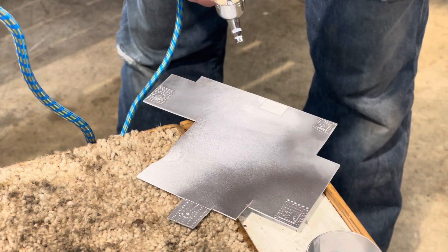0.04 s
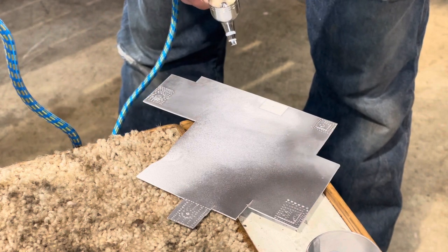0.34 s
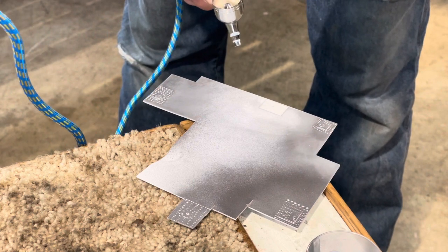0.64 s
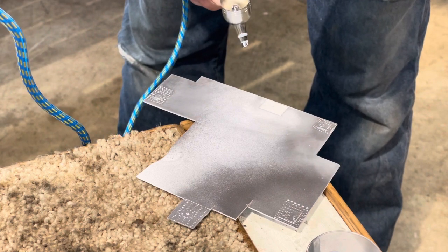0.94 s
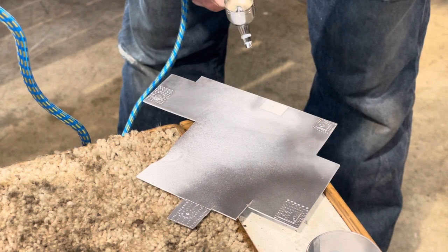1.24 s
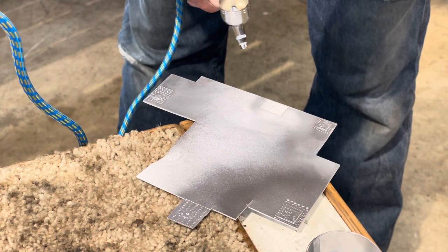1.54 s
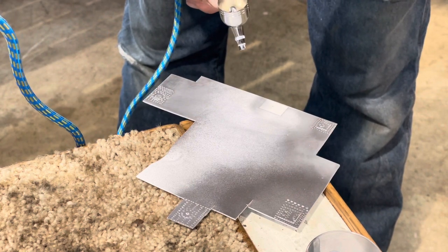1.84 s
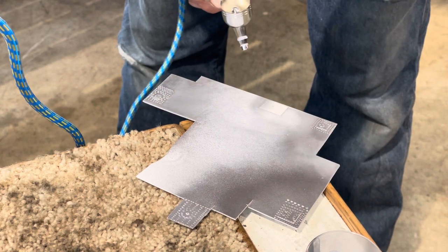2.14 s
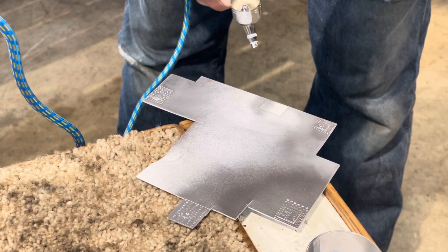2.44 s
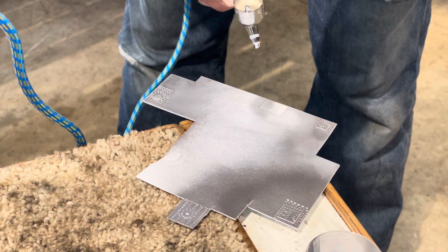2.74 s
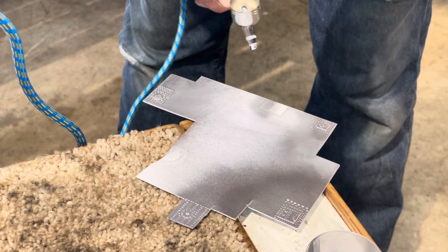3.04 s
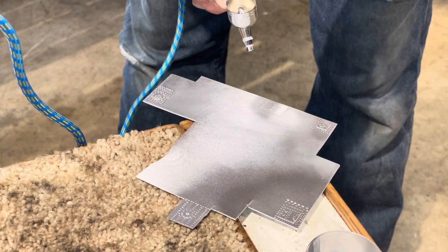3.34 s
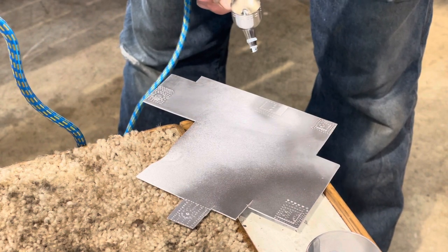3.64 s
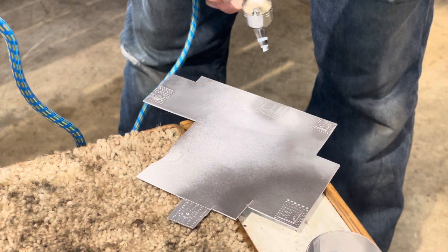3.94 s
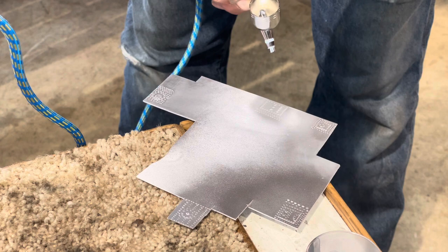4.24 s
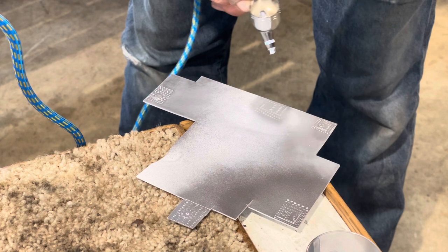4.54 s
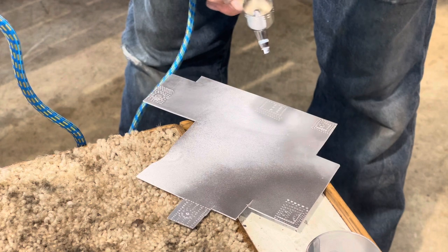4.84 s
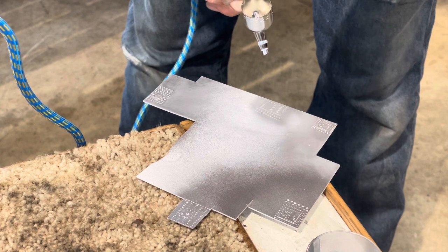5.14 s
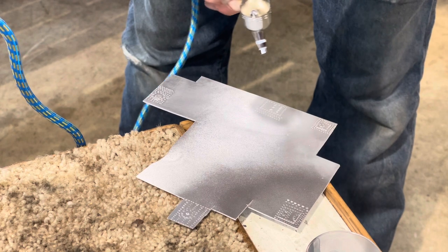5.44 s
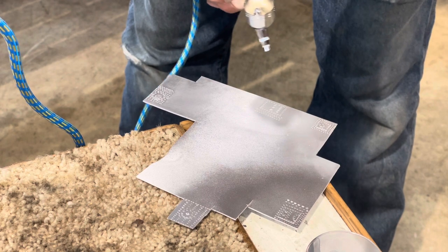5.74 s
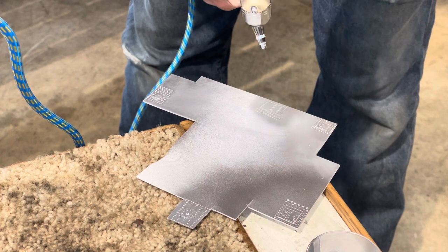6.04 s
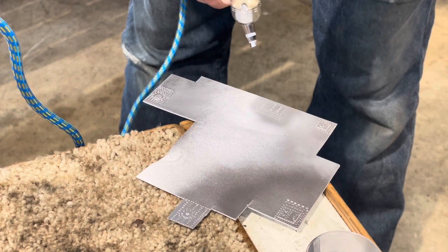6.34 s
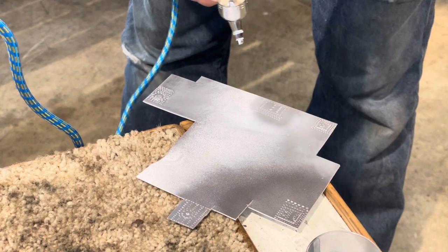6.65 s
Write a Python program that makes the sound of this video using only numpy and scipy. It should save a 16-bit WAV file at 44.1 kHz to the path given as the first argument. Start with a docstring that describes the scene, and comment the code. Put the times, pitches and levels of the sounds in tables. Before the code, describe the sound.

An airbrush sprays close to a stereo microphone at a workshop bench, giving a fine, steady, high hiss. As it sweeps to and fro over a thin metal plate, the air jet catches the edge and flares into a short, lower rush, nearly three times a second. The pulses weaken a little near the end. Nearby surfaces add short echoes, and a faint room rumble and low drone lie behind.

```python
"""At a workshop bench, an airbrush sweeps to and fro over a thin metal plate near a stereo microphone.
The nozzle hisses steadily. On every stroke the air jet crosses the plate's edge and flares into
a lower rush. The bench, floor and clutter send back short echoes.
Behind it all lie the room's rumble and a low drone, like distant traffic."""
import sys
import numpy as np
from scipy import signal
from scipy.fft import rfft, irfft, next_fast_len
from scipy.io import wavfile
from scipy.ndimage import uniform_filter1d, map_coordinates

SR = 44100
rng = np.random.default_rng(int(sys.argv[2]) if len(sys.argv) > 2 else 0)


def transcribe(signal):
    """Save signal, clipped to [-1, 1], as a 16-bit WAV file at the path in sys.argv[1]."""
    frames = np.atleast_2d(signal).T
    limited = np.clip(frames, -1, 1)
    pcm = np.round(limited * 32767).astype(np.int16)
    wavfile.write(sys.argv[1], SR, pcm)


N = 303408

# The jet crosses the plate's edge. Each row: middle in seconds, base level in dB, half length in seconds.
CROSSINGS = [(0.134, -27.5, 0.048), (0.506, -26.3, 0.047), (0.905, -27.0, .056), (1.267, -27, .05),
             (1.646, -32.5, .047), (2.03, -29, .051), (2.408, -30.1, 0.046), (2.786, -30.5, .044),
             (3.156, -27.5, .043), (3.527, -30, 0.043), (3.893, -28.5, 0.043), (4.256, -28.0, .043),
             (4.628, -27.5, .048), (5.006, -28.5, .046), (5.347, -30.5, .043), (5.714, -33.5, .037),
             (6.074, -35, .031), (6.436, -33.5, .033), (6.814, -31, 0.046)]
# How the nozzle is held. Each row: time in seconds, a score for how squarely it faces the microphone,
# boost of its high resonance in dB.
NOZZLE_AIM = [(0, 2, -2), (1.3, 2.5, -2), (2, 1, 1), (3, 0.8, 2.5), (4, -.5, 2), (5, -2, 2.5), (5.9, -2, 2),
              (6.88, -1.8, -1)]


def nozzle_hiss(hiss_db, dip_db):
    """Air leaving the nozzle makes a fine, fluttering hiss whose tone follows the aim."""
    # The tone of the hiss. Each row: frequency in Hz, level in dB.
    hiss_tone = [(400, -33), (1800, -27), (3100, -22.5), (4500, -15), (5300, -12.5), (6000, -7.5),
                 (7100, -2.5), (8500, -3), (9300, 0), (10200, -11), (11200, -7.5), (12500, -16),
                 (14000, -20), (15600, -19.5)]
    facing, resonance_db = curves(NOZZLE_AIM)
    times, db, halves = np.transpose(CROSSINGS)
    on_edge = bells(times, amp((db - db.max()) / 2), 1.35 * halves)  # 0 on the plate, up to 1 on its edge
    noise = stereo_noise(lambda hz: amp(along(hiss_tone, hz)))
    body, rest = split(noise, corner_hz=8970, order=24)
    resonance, rest = split(rest, corner_hz=10100, order=40)
    sheen, top = split(rest, corner_hz=12600, order=40)
    body = body * amp(0.53 * facing + 1.6 * on_edge)
    sheen = sheen * amp(-dip_db * on_edge)  # the plate reflects the hiss until the jet reaches its edge
    top = top * amp(0.83 * facing + 1.6 * on_edge)  # the highest treble forms the narrowest beam
    flutter_db = 0.31 * wobble(15) + 0.38 * wobble(110)
    return amp(hiss_db + flutter_db) * (body + amp(resonance_db) * resonance + sheen + top)


def edge_rush():
    """The jet is strongest in its middle, so its rush swells and fades as it crosses the plate's edge."""
    # The tone of the rush. Each row: frequency in Hz, level in dB.
    rush_tone = [(100, -40), (250, -19.5), (450, -9.5), (630, -4), (730, -6), (850, -2.5), (1100, -3),
                 (2300, -1), (2600, 2), (3100, 0), (4850, -4.5), (5400, -13.5), (9000, -12.5), (15000, -40)]
    times, db, halves = np.transpose(CROSSINGS)
    aim_times, facing, _ = np.transpose(NOZZLE_AIM)
    # A crossing is brighter when it is stronger and when the nozzle faces the microphone.
    brightness = -2.1 + 0.81 * (db - db.mean()) + 1.15 * np.interp(times, aim_times, facing)
    low_peaks = amp(db - brightness / 2) ** 2
    high_peaks = amp(db + brightness / 4) ** 2
    # Slow air round the jet's core sheds larger swirls, so the deep part of the rush lasts longer.
    low_power = bells(times, low_peaks, halves) + 0.36 * bells(times, low_peaks, halves=0.093)
    high_power = bells(times, high_peaks, halves)
    noise = turbulence(stereo_noise(lambda hz: amp(along(rush_tone, hz))), depth_db=0.75)
    low, high = split(noise, corner_hz=1230, order=4)
    swirls_db = 0.5 * wobble(45) + 0.62 * wobble(260)
    return amp(swirls_db) * (np.sqrt(low_power) * low + np.sqrt(high_power) * high)


def turbulence(x, depth_db):
    """Churning air shifts the tone of a sound from moment to moment."""
    spectra = signal.stft(x, nperseg=512)[2]
    patches = uniform_filter1d(rng.standard_normal(spectra.shape[1:]), size=4, axis=0)  # across frequency
    patches = uniform_filter1d(patches, size=24, axis=1)  # across time
    return unit(signal.istft(spectra * amp(depth_db * unit(patches)), nperseg=512)[1][:, :N])


def near_echoes(x):
    """Short echoes colour the sound; their paths sway with the hand and lengthen as it settles."""
    # Bench, floor and other close surfaces. Each row: settled delay in seconds, gain of the echo.
    surfaces = [(.001113, 0.14), (.001437, 0.18), (.002176, .09), (.0042, -0.15), (.004524, .1)]
    short_share, settle_s = 0.054, 2.2
    t = np.arange(N) / SR
    stretch = 1 - short_share * np.exp(-t / settle_s) + 0.015 * wobble(6)
    return np.array([sum(gain * np.interp(t - delay * stretch, t, channel) for delay, gain in surfaces)
                     for channel in x])


def clutter_echoes(x, fade_s):
    """Clutter round the bench scatters the sound into a dense tail that falls 60 dB in fade_s."""
    t = np.arange(SR // 5) / SR
    tail = rng.standard_normal(len(t)) * amp(-60 * t / fade_s) * (t > 0.005)
    return signal.fftconvolve(x, tail[None] / np.linalg.norm(tail), axes=1)[:, :N]


def room_rumble(deep_db):
    """The room rumbles: the deepest part is steady, and the rest slowly swells and sinks."""
    # The tone of the rumble. Each row: frequency in Hz, level in dB.
    rumble_tone = [(22, -38), (33, -25), (45, -13), (75, 0.5), (100, -1), (130, 4), (200, -1), (250, 0),
                   (340, 0), (440, -3.5), (650, -2), (900, -6), (1500, -13), (4000, -26)]
    # The swell of its upper part. Each row: time in seconds, gain in dB.
    swell = [(0, -49), (4, -48), (5, -44.5), (5.7, -47.5), (6.2, -52.5), (6.88, -51)]
    upper_db, = curves(swell)
    noise = stereo_noise(lambda hz: amp(along(rumble_tone, hz)))
    deep, upper = split(noise, corner_hz=188, order=6)
    return amp(deep_db) * deep + amp(upper_db) * upper


def drone(waver_hz, waver_db):
    """A low, wavering tone booms now and then, climbs once like a distant engine and drops back."""
    # Brief booms. Each row: middle in seconds, level in dB, half length in seconds.
    booms = [(.27, -47, .05), (.47, -49, .06), (1.0, -49, .06), (1.44, -48.3, 0.1), (1.88, -54, .08),
             (2.82, -57, .06), (4.42, -56.5, .05), (4.8, -55.5, .17), (6.48, -57.5, 0.13)]
    idle_hz, idle_db = 57.1, -63.5
    start_s, end_s, drop_s = 4.25, 5.8, 0.25
    climb_hz_per_s, climb_db = 15, 0.5
    climbed_s, climbing = curves([(start_s, 0, 0), (start_s + drop_s, drop_s, 1),
                                  (end_s, end_s - start_s, 1), (end_s + drop_s, 0, 0)])
    times, db, halves = np.transpose(booms)
    level_db = idle_db + climb_db * climbing + waver_db * wobble(9)
    power = amp(level_db) ** 2 + bells(times, amp(db) ** 2, halves)
    hz = idle_hz + climb_hz_per_s * climbed_s + waver_hz * wobble(14)
    return np.sqrt(power) * np.sin(2 * np.pi * np.cumsum(hz) / SR)


def stereo_noise(gain):
    """Noise of average level 1, shaped by gain(hz) and nearly alike on the left and right."""
    # How alike the two channels are. Each row: frequency in Hz, likeness from 0 to 1.
    likeness = [(100, .98), (1200, .99), (1500, 1), (2300, 1), (2900, .97), (3600, 1), (7400, 1),
                (7900, .97), (8600, 1), (9200, .88), (10300, .99), (11100, .7), (12000, 1), (12900, .6),
                (13700, .99), (14500, .58), (15300, 1)]

    def mid_and_side(hz):
        angle = np.arccos(np.clip(along(likeness, hz), 0, 1)) / 2
        return gain(hz) * np.array([np.cos(angle), np.sin(angle)])

    mid, side = filtered(rng.standard_normal((2, N)), mid_and_side)
    return unit(np.array([mid + side, mid - side]))


def bells(centres, heights, halves, flatness=2.29):
    """Add up bell-shaped swells, timed in seconds; flatness above 2 gives flatter tops."""
    t = np.linspace(0, N / SR, N // 64)
    shapes = heights * np.exp(-np.abs((t[:, None] - centres) / halves) ** flatness)
    return curves(np.column_stack([t, shapes.sum(axis=1)]))[0]


def amp(db):
    """Turn decibels into a gain."""
    return 10 ** (np.asarray(db) / 20)


def unit(x):
    """Scale x to an average (rms) level of 1."""
    return x / np.sqrt(np.mean(x ** 2) + 1e-20)


def along(points, hz):
    """Read between rows of frequency and value, on a log frequency scale."""
    freqs, values = np.transpose(points)
    return np.interp(np.log(hz + 1), np.log(freqs + 1), values)


def curves(rows):
    """Give one value per sample for each column after the time."""
    times, *columns = np.transpose(rows)
    return [np.interp(np.arange(N) / SR, times, column) for column in columns]


def wobble(rate):
    """A smooth curve through rate random values a second."""
    return map_coordinates(rng.standard_normal(N // 20), [np.arange(N) * rate / SR], mode="mirror")


def filtered(x, response):
    """Multiply each frequency in x by response(hz)."""
    size = next_fast_len(N + SR // 2)
    return irfft(rfft(x, size) * response(np.fft.rfftfreq(size, 1 / SR)), size)[..., :N]


def split(x, corner_hz, order):
    """The parts of x below and above corner_hz; a higher order cuts more sharply."""
    low = filtered(x, lambda hz: 1 / (1 + (hz / corner_hz) ** order))
    return low, x - low


def scene():
    """Mix airbrush, echoes and background; the narrow hiss reaches the surfaces less than the rush."""
    hiss = nozzle_hiss(hiss_db=-27.0, dip_db=4.0)
    rush = edge_rush()
    spread = np.mean(rush + 0.5 * hiss, axis=0, keepdims=True)
    echoes = near_echoes(spread) + amp(-11.5) * clutter_echoes(spread, fade_s=0.15)
    return hiss + rush + echoes + room_rumble(deep_db=-50.5) + drone(waver_hz=2.94, waver_db=2.5)


def record(dry):
    """The microphone leans left in the bass, shifts the channels apart in the treble and cuts the top."""
    # The lean to the left. Each row: frequency in Hz, left level minus right level in dB.
    balance = [(60, 1.6), (300, 2.3), (600, 1.7), (1500, 0)]
    # The phase shift between channels. Each row: frequency in Hz, how far the left is ahead in radians.
    left_lead = [(8850, 0), (9100, 1.3), (10150, 3.1), (10450, 3.3), (11800, 6.28), (12300, 6.28),
                 (13000, 7.7), (13300, 9.35), (14050, 9.5), (14500, 11.4), (15100, 12.56)]
    top_hz = 15800
    sides = np.array([[1], [-1]]) / 2
    pair = filtered(dry, lambda hz: amp(sides * along(balance, hz))
                    * np.exp(1j * sides * along(left_lead, hz)))
    return filtered(pair, lambda hz: hz < top_hz)


dry = scene()
out = record(dry)
transcribe(out)
```